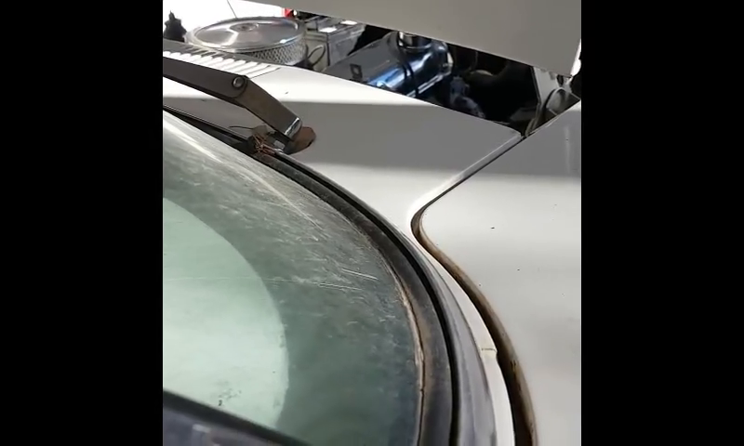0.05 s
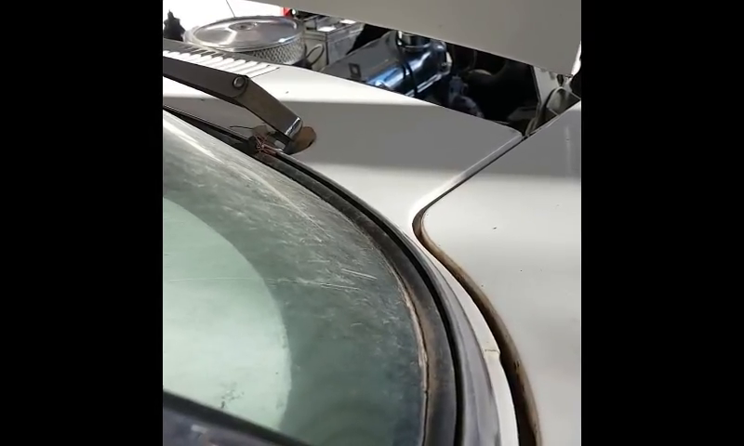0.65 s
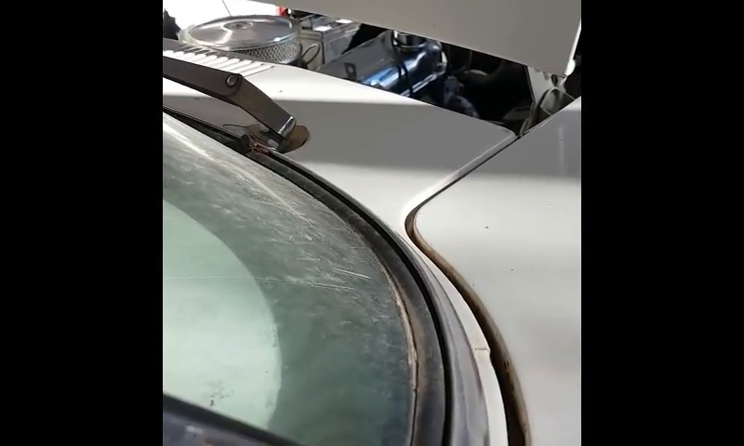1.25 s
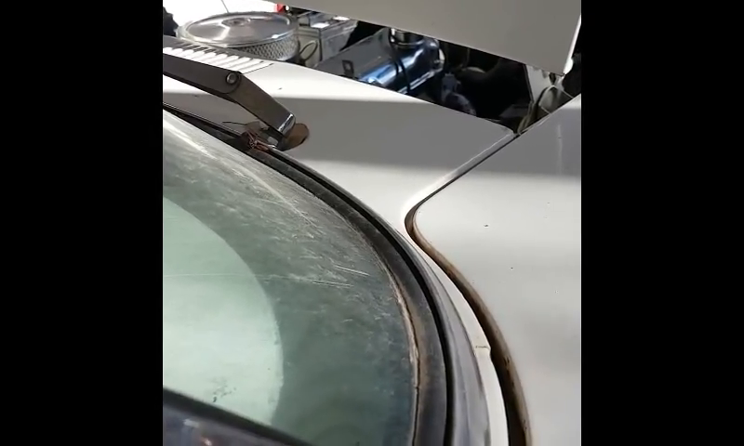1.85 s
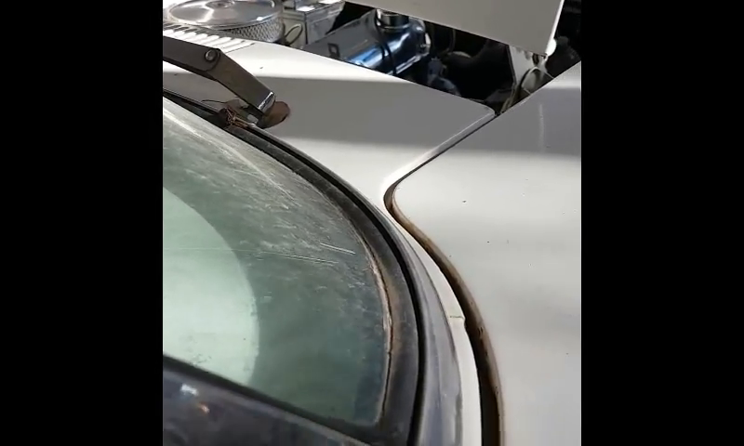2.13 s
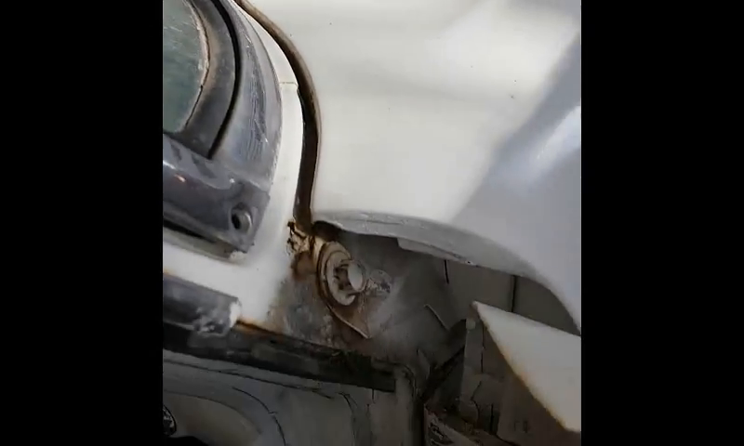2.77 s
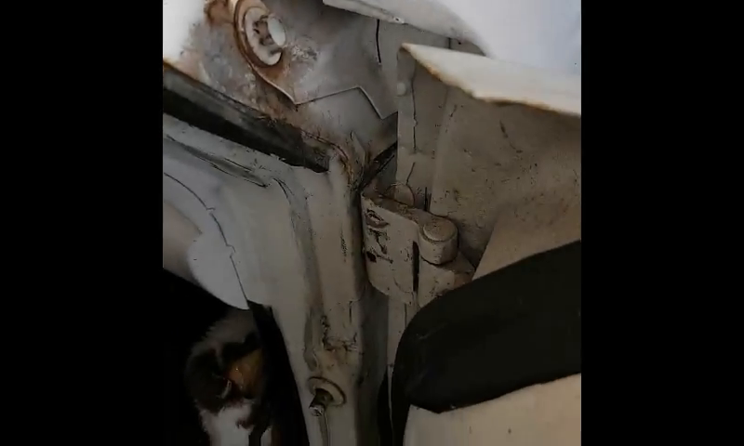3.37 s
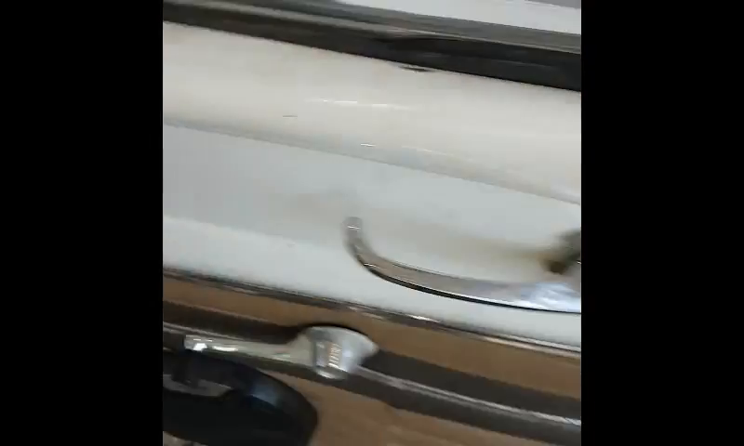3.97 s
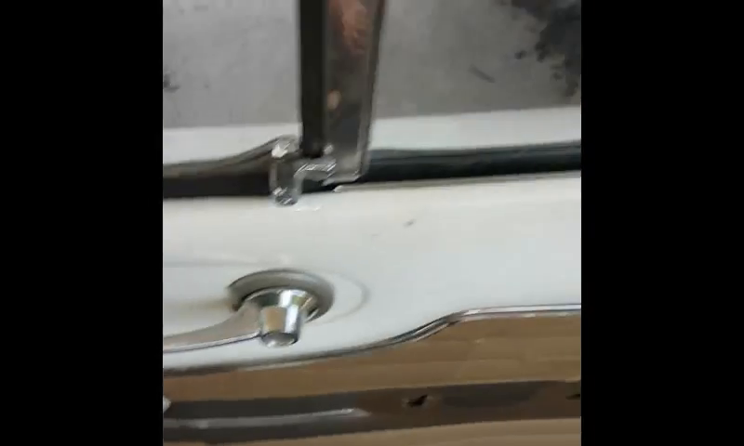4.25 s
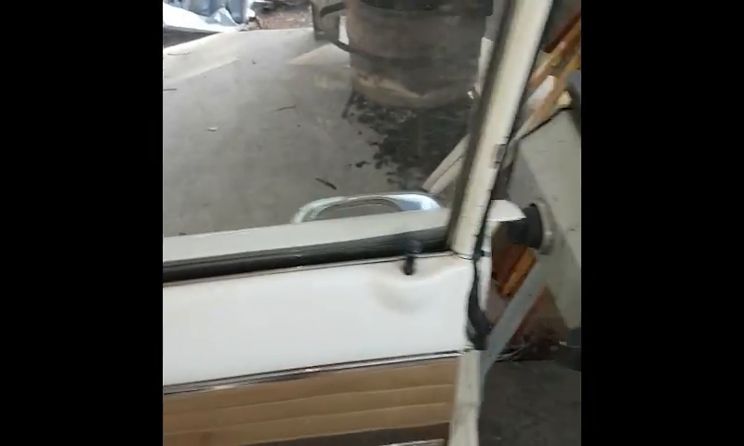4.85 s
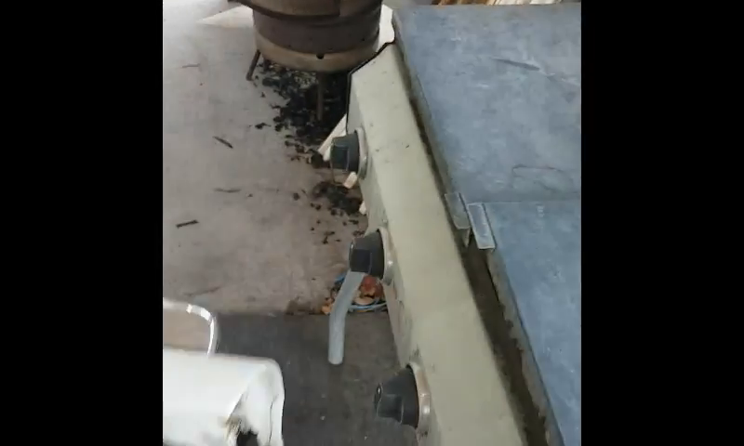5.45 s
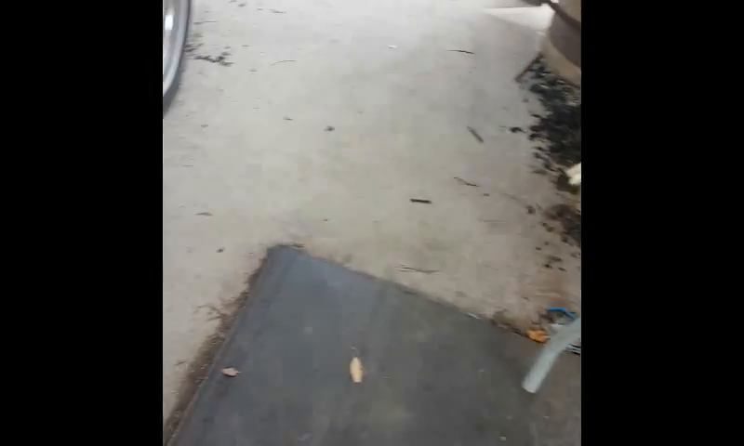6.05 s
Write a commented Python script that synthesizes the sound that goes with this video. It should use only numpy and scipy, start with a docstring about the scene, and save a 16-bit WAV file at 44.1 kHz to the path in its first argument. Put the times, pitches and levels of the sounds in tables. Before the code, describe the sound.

From the very start, a starter motor grinds and whines as it turns over an old car engine in a slightly reverberant garage. The engine knocks and throbs evenly, about eight strokes a second, but never fires. At about 2.2 seconds the starter is released and whirrs down while the engine rocks to a halt with three soft thuds and a small clack. At 2.6 seconds the open car door gives a hard, quick double clunk with a short metallic ring. The rest is quieter and close. Faint bumps come around 3 seconds, and a latch snaps at 3.5. Keys clink from 3.7 to 4.4 seconds, brightest around 4.2. A shoe scuffs gritty concrete at 4.6, followed by a soft step at 5.2 and a faint scuff near 5.8. Low handling rumble from the carried microphone and a light swish of clothing lie underneath the second half.

```python
"""Engine that will not start

In a garage a starter grinds and whines, turning an old six-cylinder engine that knocks and throbs at
each compression but never fires. Let go, the starter whirrs down and the engine rocks to a halt.
The open door clunks twice, a latch snaps, keys clink and a shoe scuffs the concrete, all over the
rumble of a microphone carried along the car."""
import sys
import numpy as np
from scipy import signal
from scipy.fft import rfft, irfft
from scipy.io import wavfile

SR = 44100
rng = np.random.default_rng(int(sys.argv[2]) if len(sys.argv) > 2 else 0)


def int16_out(signal):
    """Quantize to a 16-bit WAV file."""
    q = np.round(np.clip(np.atleast_2d(signal).T, -1, 1) * 32767)
    wavfile.write(sys.argv[1], SR, q.astype(np.int16))


N = 269451
TIME = np.arange(N) / SR

# Levels are relative; pan is left minus right.
# cylinders in compression order: knock level/dB, gear load/dB
CYLINDER_LOADS = [(-17.5, -29.5), (-20.3, -29), (-18, -28), (-20, -28.5), (-17.5, -29.5), (-17.5, -28)]
# the drive taking up slack within a stroke: delay/s, level/dB, energy decay/s
SLACK_BLOWS = [(0.0, 0.5, 0.018), (0.009, -4, 0.01), (.028, 0, 0.014)]
# intake and mount pulses within a stroke: delay/s, f/Hz, level/dB, swell/s, pan/dB
STROKE_THROBS = [(-.012, 137.8, -23, 0.013, -1), (0.013, 162.2, -21.5, 0.012, -2),
                 (.024, 72, -27.5, 0.018, -6.5), (0.062, 140, -20.5, 0.0078, 0),
                 (0.0594, 72.8, -24.5, 0.018, -5.5), (0.0596, 82, -38, 0.014, 20),
                 (0.045, 34, -55, 0.027, 2.5)]
# starter through one stroke: share of stroke, speed factor, grind level/dB, hiss level/dB
STROKE_CYCLE = [(0, 0.96, 0.5, 7.5), (.15, 0.99, 4.5, 11), (0.359, 1.04, 1, 5), (.56, 1.06, -1.5, 4),
                (0.761, 1.0, -1, 7), (0.931, .96, -0.5, 4)]
# faders for starter and handling rumble: t/s, level/dB
STARTER_FADER = [(0, -1), (2.17, -0.5), (2.225, 0.5), (2.26, -10.5), (2.3, -37), (2.4, -68)]
RUMBLE_FADER = [(2.6, -47), (3.15, -53.5), (4.55, -51.5), (5.0, -63), (5.8, -65.5), (6.11, -59.5)]
# tone colour of each source: f/Hz, level/dB
KNOCK_EQ = [(130, -17), (270, -6.5), (400, 4.5), (650, -2.5), (880, -7.5), (1200, -2), (1800, -10.5),
            (2400, -6.5), (3200, -12), (4000, -17), (6000, -60)]
GRIND_EQ = [(130, -28), (250, -2), (450, -1.5), (850, -7), (1200, -13.5), (1750, -5.5), (2300, 1.5),
            (2900, -1), (3900, -8.5), (5500, -11), (8200, -14.5), (9800, -24.5), (15000, -26)]
WHINE_EQ = [(300, -16), (800, -13), (1250, -13), (1500, -10), (1800, -14), (2050, -5.5), (2300, -3),
            (2550, 1.5), (2820, -1), (3080, -9), (3350, -7), (4200, -22), (5300, -14.5), (6500, -26)]
RUMBLE_EQ = [(12, -25), (20, 0), (49, 2.5), (134, 5), (254, -1), (285, -14), (312, -6), (338, -4.5),
             (450, -18.5), (580, -52), (990, -120)]
AIR_EQ = [(120, -33), (200, -10), (240, -17), (416, -8), (590, -12.5), (806, -13), (1370, -14.5),
          (8900, -29), (11700, -34), (16000, -26.5)]
COAST_EQ = [(29, -60), (50, -5), (152, -7), (258, -10.5), (380, -13), (520, -15.5), (783, -10.5),
            (863, -25.5), (1150, -16.5), (2380, -16.5), (14500, -39.5), (16000, -64.5)]
ROCK_EQ = [(90, -4), (200, -22), (300, -2.5), (420, -9.5), (560, -3), (690, -1.5), (900, -17), (1300, -16),
           (1850, -18), (3000, -35), (8000, -40.5), (15000, -69)]
PINION_EQ = [(600, -16), (1100, -4), (1500, -19), (1850, 3), (2150, -9), (2700, -22), (6000, -27),
             (15000, -45)]
CLUNK_EQ = [(53, -37), (90, -17.5), (376, -4.5), (521, -14), (1160, -5.5), (1830, -19), (2000, -7),
            (2710, -0.5), (3080, -12.5), (3360, -7), (3910, -17.5), (6870, -21), (16000, -36.5)]
BUMP_EQ = [(90, -31), (170, -5), (330, -6), (600, 3), (1000, -6), (1700, -13), (3000, -10), (9000, -51)]
STEP_EQ = [(90, -23), (200, 4), (380, 2), (560, 1), (800, -5.5), (1600, -9), (2800, -14), (9000, -58)]
LATCH_EQ = [(240, -35), (400, -21.5), (964, -21), (1270, -14), (1460, -19), (2120, -7), (3120, -6),
            (3370, -6.5), (4510, -20.5), (5690, -12.5), (12100, -46), (13300, -17), (14500, -29),
            (16000, -42)]
KEY_EQ = [(900, -25), (2500, 1.5), (4600, -2), (6000, 2.5), (8300, 1.5), (10500, -1.5), (14500, 4),
          (16000, -2)]
SCUFF_EQ = [(410, -48), (700, -16.5), (788, -21), (1280, -12), (1540, -10.5), (2800, -2), (4210, -6.5),
            (5760, -5.5), (7110, -7.5), (14800, -10.5), (16000, -24)]
GRIT_EQ = [(500, -11), (1500, -3), (2500, 8), (4000, -13), (8000, -24), (15000, -15)]
# resonances of block, bay and bonnet, and of the body panels: f/Hz, width/Hz, lift/dB
BAY_PEAKS = [(216.5, 15, 12.5), (339.7, 26, 2.5), (403.7, 21, 5.5), (600, 30, 4.5), (661, 65, 4.5),
             (757, 31, 0.5), (807, 18, 5), (1060, 60, 8), (1170, 42, 6.5), (1308, 26, 8.5), (1404, 21, 7.5),
             (1522, 23, 6.5), (1701, 39, 8.5), (1969, 52, 8), (2310, 13, 5), (2274, 110, 4.5),
             (2420, 46, 3.5), (2606, 53, -1.5), (2756, 31, 6), (3260, 41, 3.5), (5400, 29, 6),
             (5980, 41, 6), (6390, 44, 7)]
PANEL_PEAKS = [(297, 47, 7), (342, 29, 0), (968, 60, 11), (1090, 60, 10), (2065, 100, 7.5),
               (2380, 170, -0.5)]
# last rocks of the crankshaft: t/s, level/dB, decay/s
ROCK_CUES = [(2.326, -21, 0.018), (2.421, -21, 0.025), (2.545, -23, 0.035)]
# single impacts: t/s, level/dB, pan/dB, decay/s
PINION_CUES = [(2.562, -23.5, -2.5, 0.021)]
CLUNK_CUES = [(2.618, -29, -4, .006), (2.6225, -7, -5, 0.0054), (2.632, -21, -9, 0.022),
              (2.6615, -11.5, -2.5, 0.012)]
BUMP_CUES = [(3.02, -49.5, 4, 0.036), (3.229, -50, 1.5, 0.061), (3.68, -49, 2, 0.016)]
STEP_CUES = [(3.396, -44.5, -3, 0.025), (5.198, -39.5, -1, 0.016)]
LATCH_CUES = [(3.443, -40.5, -1, 0.035), (3.4595, -23, -9.5, 0.011), (3.468, -28, 0, 0.014)]
GRIT_CUES = [(4.603, -28.5, 0, 0.0043), (4.654, -46, 0, .004), (4.71, -43, -5, 0.0044),
             (4.767, -38.5, -1, 0.0065), (4.836, -35.5, 0, 0.0037), (5.019, -44, -4, 0.004),
             (5.112, -45, -5, 0.0091), (5.259, -43.5, -9, 0.0049), (5.85, -56, -2, 0.0044)]
# ring of the struck parts: f/Hz, level/dB, t60/s
DOOR_MODES = [(357.6, -18.5, 0.28), (983, -21.5, 0.47), (1100, -9, 0.06), (1117, -8.5, 0.092),
              (2490, -8, .05), (2534, 2, 0.036), (2940, -31, 0.056), (3350, -22, .07)]
DOOR_SKIN_MODES = [(292.4, 7, 0.37), (343, 1.5, 0.48), (373, -3, .25)]
LATCH_MODES = [(2272, -11, .07), (2930, -10, .07), (3292, -2, .05), (3345, -4, .06), (5537, -10, .06),
               (13140, -15, .05)]
KEY_MODES = [(4550, -2.5, 0.035), (7930, -6, 0.08), (8500, -18, 0.056), (8900, -6, 0.04),
             (12700, -12, 0.067), (13150, -13, 0.037), (14600, -15, 0.11), (14600, -7, 0.047)]
# key clinks: t/s, level/dB, pan/dB, swell of the lead-in slide/s
KEY_CUES = [(3.7072, -43, -3.5, 0.011), (3.8631, -40, -5.0, 0.0027), (3.9185, -39, -7, 0.0018),
            (3.9787, -34, -4, .011), (4.049, -47, -6.0, .004), (4.12, -33.5, -5.5, 0.034),
            (4.1597, -18, -5, 0.011), (4.2083, -19, -2, .001), (4.343, -22.5, -7, 0.014),
            (4.4184, -38, -4, .001), (5.234, -50, -3, .001)]
# shoe scuffs: t/s, level/dB, attack/s, hold/s, decay/s
SCUFF_CUES = [(4.592, -34, 0.014, .005, 0.025), (4.626, -34.5, 0.018, .028, .018),
              (4.688, -37.5, .006, 0.024, .018), (4.753, -43.5, .007, 0.059, .085),
              (5.832, -48, 0.073, 0.082, 0.12)]
# swishes of clothing: centre t/s, level/dB, half length/s
SWISH_CUES = [(4.42, -55, 0.96), (5.367, -56, 0.38), (6.1, -51, 0.27)]
# likeness of left and right: f/Hz, correlation
STEREO_LIKENESS = [(60, 0.94), (130, 0.8), (290, 1), (640, 0.69), (1410, 0), (3100, 0), (15000, 0)]
# garage reverb time: f/Hz, t60/s
GARAGE_DECAY = [(100, 0.23), (400, 1), (1000, 1), (2500, 0.69), (6000, 0.48), (15000, 0.26)]


def gain_of(db):
    """Decibels to amplitude."""
    return 10 ** (np.asarray(db) / 20)


def unit_rms(x):
    """Scales to rms 1."""
    return x / np.sqrt(np.mean(x ** 2) + 1e-20)


def at_hz(points, hz):
    """Reads a curve on a log-frequency axis."""
    f, value = np.transpose(points)
    return np.interp(np.log(hz + 1), np.log(f + 1), value)


def fader_db(points):
    """Straight ramps between fader points."""
    return np.interp(TIME, *np.transpose(points))


def add(mix, s, sound):
    """Mixes a sound in at time s."""
    start = round(s * SR)
    sound = sound[..., max(-start, 0):]
    part = mix[..., max(start, 0):][..., :sound.shape[-1]]
    part += sound[..., :part.shape[-1]]


def panned(x, pan_db):
    """Leans a pair to the left by pan_db."""
    return x * gain_of([[pan_db / 2], [-pan_db / 2]])


def coloured(x, eq, peaks=(), size=8192):
    """Unit-power causal EQ that turns two unrelated signals into a stereo pair, alike in the bass."""
    hz = np.arange(size // 2 + 1) * SR / size
    db = at_hz(eq, hz) + sum(lift / (1 + (2 * (hz - f) / width) ** 2) for f, width, lift in peaks)
    cepstrum = irfft(np.log(unit_rms(gain_of(db)) + 1e-6))
    cepstrum[1:size // 2] *= 2  # fold to minimum phase
    cepstrum[size // 2 + 1:] = 0
    colour = np.exp(rfft(cepstrum))
    likeness = np.clip(at_hz(STEREO_LIKENESS, hz), -0.99, 0.99)
    filters = [irfft(colour * np.sqrt((1 + sign * likeness) / 2))[:size // 2] for sign in (1, -1)]
    mid, side = (signal.oaconvolve(v, fir)[:len(v)] for v, fir in zip(x, filters))
    return np.array([mid + side, mid - side])


def grit(length, spread_db):
    """Dense tiny impacts of uneven size, two channels."""
    noise, sizes = rng.standard_normal((2, 2, length))
    return unit_rms(noise * gain_of(spread_db * np.minimum(sizes, 3.35)))


def drift(rate_hz):
    """Smooth random wander of rms 1."""
    hz = np.arange(N // 2 + 1) * SR / N
    return unit_rms(irfft(rfft(rng.standard_normal(N)) * np.exp(-(hz / rate_hz) ** 2), N))


def ring(modes, t, scatter_db=2.6, detune=0.004):
    """Decaying modes; every blow excites them a little differently."""
    out = 0
    for hz, db, t60 in modes:
        envelope = gain_of(db - scatter_db * rng.standard_normal() - 60 * t / t60)
        pitch = hz * (1 + detune * rng.standard_normal())
        out += envelope * np.sin(2 * np.pi * (pitch * t + rng.random((2, 1))))
    return out


def hits(cues, eq, modes=(), ring_db=0, *, rise_s):
    """Each blow is a burst of contact noise plus the ring of any modes given."""
    t, out = TIME[:SR // 2], np.zeros((2, N))
    for s, db, pan_db, decay in cues:
        attack = np.minimum(t / rise_s, 1)
        contact = coloured(rng.standard_normal((2, len(t))) * attack * np.exp(-t / decay), eq)
        ringing = gain_of(ring_db) * attack * ring(modes, t)
        add(out, s, gain_of(db) * panned(contact + ringing, pan_db))
    return out


def strokes(count=19, first_s=0.0049, period_s=0.11896, quicken_s=0.000088):
    """Cylinders compress in turn, slowly gaining speed: t/s, knock level/dB, gear load/dB."""
    k = np.arange(count)
    starts = first_s + k * period_s - quicken_s * k * (k - 1) / 2
    return [(s, *CYLINDER_LOADS[i % len(CYLINDER_LOADS)]) for i, s in enumerate(starts)]


def knocks(level_db=0.5, repeat_share=0.59, rise_s=0.0016):
    """Past each compression the drive clatters; every third stroke sounds much alike."""
    t, out = TIME[:SR // 4], np.zeros((2, N))
    energy = np.zeros(len(t))
    for delay, db, decay in SLACK_BLOWS:
        age = np.maximum(t - delay, 0)
        energy += (gain_of(db) * np.minimum(age / rise_s, 1)) ** 2 * np.exp(-age / decay)
    patterns = [grit(len(t), spread_db=3) for _ in range(3)]
    for k, (s, db, _) in enumerate(strokes()):
        fresh = grit(len(t), spread_db=3)
        clatter = np.sqrt(repeat_share) * patterns[k % 3] + np.sqrt(1 - repeat_share) * fresh
        add(out, s, gain_of(db + level_db) * np.sqrt(energy) * clatter)
    return panned(coloured(out, KNOCK_EQ, BAY_PEAKS), pan_db=2.2)


def throbs(level_db=-1, detune=0.024, left_lead_s=0.00012, roughness=0.6):
    """Each stroke gulps air and shakes the engine raggedly on its mounts."""
    t, out = TIME[:SR // 5], np.zeros((2, N))
    wander = np.array([drift(rate_hz=62) + 1j * drift(rate_hz=56) for _ in range(3)])
    ragged = roughness * (0.51 * wander[0] + 0.31 * wander[1:])  # partly shared by both sides
    for s, _, _ in strokes():
        for delay, hz, db, swell, pan_db in STROKE_THROBS:
            pitch = hz * (1 + detune * rng.standard_normal())
            push = gain_of(db + level_db) * t / swell * np.exp(1 - t / swell)
            swing = np.exp(2j * np.pi * pitch * (t + np.array([[left_lead_s], [0]])))
            shake = 1 + ragged[:, rng.integers(N - len(t)):][:, :len(t)]
            add(out, s + delay, panned(push * (swing * shake).imag / np.hypot(1, roughness), pan_db))
    return out


def whine(hz, harmonics):
    """Meshing teeth; each harmonic reaches left and right with its own phase."""
    turns = np.cumsum(hz) / SR
    partials = (np.cos(2 * np.pi * (k * turns + rng.random((2, 1)))) for k in range(1, harmonics + 1))
    return unit_rms(sum(partials))


def bay_scatter(x, decay_s):
    """Many short paths out of the engine bay make a gliding tone flare and fade."""
    t = TIME[:SR // 15]
    paths = rng.standard_normal((2, len(t))) * np.exp(-t / decay_s)
    return signal.oaconvolve(x, paths / np.linalg.norm(paths, axis=1, keepdims=True), axes=1)[:, :N]


def starter(level_db=3.5, mesh_hz=255, tone_db=-2, tooth_depth=0.1, hiss_hz=3700):
    """The pinion grinds and whines on the ring gear, slowing at each compression and racing after it."""
    starts, _, load_db = np.transpose(strokes())
    edges = np.append(starts, 2 * starts[-1] - starts[-2])
    stroke = np.interp(TIME, edges, np.arange(len(edges)))
    share, *columns = np.transpose(STROKE_CYCLE)
    speed, grind_db, hiss_db = (np.interp(stroke, share, c, period=1) for c in columns)
    # unequal cylinder pressures also swing speed and whine once a crank turn
    crank = 2 * np.pi * stroke / 3
    waver = 0.01 * drift(rate_hz=58.4) + 0.013 * drift(rate_hz=6.01)
    hz = mesh_hz * speed * (1 + 0.0363 * np.cos(crank - 2.9) + waver)
    teeth = 1 + tooth_depth * np.cos(2 * np.pi * np.cumsum(hz) / SR)
    grind = coloured(unit_rms(teeth * grit(N, spread_db=2)), GRIND_EQ, BAY_PEAKS)
    hiss = signal.sosfiltfilt(signal.butter(2, hiss_hz, "high", fs=SR, output="sos"), grind)
    tone = unit_rms(coloured(whine(hz, harmonics=22), WHINE_EQ, BAY_PEAKS))
    tone = bay_scatter(tone * gain_of(tone_db + 3.4 * np.cos(crank - 2.3)), decay_s=0.0072)
    body = (grind - hiss) * gain_of(grind_db) + tone
    flutter = gain_of(3.43 * drift(rate_hz=15))
    sound = panned(body * flutter, pan_db=-5.5) + hiss * gain_of(hiss_db)
    return sound * gain_of(level_db + np.interp(TIME, starts, load_db) + fader_db(STARTER_FADER))


def background(air_db=-61):
    """Lumpy rumble of the carried microphone, soft garage air and the swish of clothes."""
    rumble = coloured(rng.standard_normal((2, N)), RUMBLE_EQ)
    rumble *= gain_of(fader_db(RUMBLE_FADER) + 1.4 * drift(rate_hz=4.9))
    swishes = [gain_of(db) * np.exp(-((TIME - s) / half) ** 2) for s, db, half in SWISH_CUES]
    air_level = np.sqrt(gain_of(air_db) ** 2 + sum(swish ** 2 for swish in swishes))
    return panned(rumble + coloured(grit(N, spread_db=4.5), AIR_EQ) * air_level, pan_db=-1)


def coasting(release_s=2.25, level_db=-29, brake_per_s=0.81, whirr_hz=1000, tone_db=-12, rise_s=0.092):
    """Released, the armature whirrs down to rest under steady friction, quieter as it slows."""
    age = TIME - release_s
    speed = np.clip(1 - brake_per_s * age, 1e-3, 1)
    level = gain_of(level_db + 52 * np.log10(speed)) * np.clip(1 + age / rise_s, 0, 1)
    hz = whirr_hz * speed * (1 + 0.02 * drift(rate_hz=61.8))
    tone = bay_scatter(whine(hz, harmonics=4), decay_s=0.0091)
    whirr = gain_of(tone_db) * unit_rms(coloured(tone, COAST_EQ, PANEL_PEAKS))
    return level * (coloured(grit(N, spread_db=4), COAST_EQ, PANEL_PEAKS) + whirr)


def crank_rocks():
    """The crankshaft rocks to a halt in soft thuds."""
    return hits([(s, db, 0, decay) for s, db, decay in ROCK_CUES], ROCK_EQ, rise_s=0.0081)


def pinion_clack():
    """The starter pinion draws back."""
    return hits(PINION_CUES, PINION_EQ, rise_s=0.006)


def door_clunks():
    """Hard blows set the open door ringing."""
    return hits(CLUNK_CUES, CLUNK_EQ, DOOR_MODES, ring_db=-2, rise_s=0.0017)


def door_bumps():
    """The door skin hums under soft bumps."""
    return hits(BUMP_CUES, BUMP_EQ, DOOR_SKIN_MODES, ring_db=-3, rise_s=0.004)


def steps():
    """A shoe lands with a hollow knock."""
    return hits(STEP_CUES, STEP_EQ, rise_s=0.0012)


def latch():
    """The latch snaps with a short, bright ring."""
    return hits(LATCH_CUES, LATCH_EQ, LATCH_MODES, ring_db=5.5, rise_s=0.0013)


def keys(level_db=-11, contact_s=0.0043, slide_db=-17, settle_s=0.014, detune=0.0114):
    """Keys slide on their ring, ever harder until they clink; each clink is a slightly different key."""
    clinks, slide_level = np.zeros((2, N)), np.zeros(N)
    for s, db, pan_db, swell in KEY_CUES:
        tuning = 1 + detune * rng.standard_normal()
        modes = [(hz * tuning, mode_db, t60) for hz, mode_db, t60 in KEY_MODES]
        cue = (s, db + level_db, pan_db, contact_s)
        clinks += hits([cue], KEY_EQ, modes, ring_db=5.5, rise_s=0.0011)
        falloff = np.maximum((s - TIME) / swell, (TIME - s) / settle_s)
        slide_level += gain_of(db + slide_db) * np.exp(-np.minimum(falloff, 20))
    return clinks + panned(coloured(grit(N, spread_db=12.5), KEY_EQ) * slide_level, pan_db=-6.5)


def scuffs():
    """A sole lands, drags grit over the concrete and eases off."""
    level = np.zeros(N)
    for s, db, attack, hold, decay in SCUFF_CUES:
        release = np.exp(-np.maximum(TIME - s - attack - hold, 0) / decay)
        level += gain_of(db) * np.clip((TIME - s) / attack, 0, 1) * release
    scrape = grit(N, spread_db=7) * level * gain_of(1.6 * drift(rate_hz=68))
    return panned(coloured(scrape, SCUFF_EQ), pan_db=-2.5)


def grit_ticks():
    """Single grains tick underfoot."""
    return hits(GRIT_CUES, GRIT_EQ, rise_s=0.00093)


def garage(x, predelay_s=0.0081):
    """Diffuse reflections, each band dying at its own speed."""
    hz, t, bands = signal.stft(rng.standard_normal((2, SR)), SR, nperseg=256)
    decay = gain_of(-60 * t / at_hz(GARAGE_DECAY, hz)[:, None])
    tail = signal.istft(bands * decay, SR, nperseg=256)[1][:, :SR] * (TIME[:SR] > predelay_s)
    return signal.fftconvolve(x, tail / np.linalg.norm(tail[0]), axes=1)[:, :N]


def scene():
    """Engine bay ahead with the most reverb; door, feet and keys close and drier."""
    halt = crank_rocks() + pinion_clack()
    engine = knocks() + starter() + coasting() + halt
    door = door_clunks()
    foley = door_bumps() + steps() + grit_ticks() + scuffs() + latch() + keys()
    room = garage(gain_of(-13.5) * engine + gain_of(-22) * door + gain_of(-28) * foley)
    return engine + throbs() + door + foley + room + background()


def record(dry):
    """A steep low-pass trims the very top."""
    lowpass = signal.firwin(255, cutoff=15950, window=("kaiser", 9), fs=SR)
    return signal.oaconvolve(dry, lowpass[None], "same")


dry = scene()
out = record(dry)
int16_out(out)
```